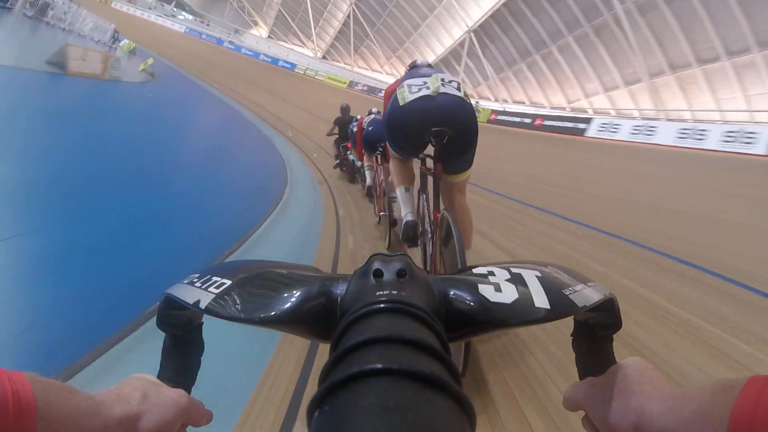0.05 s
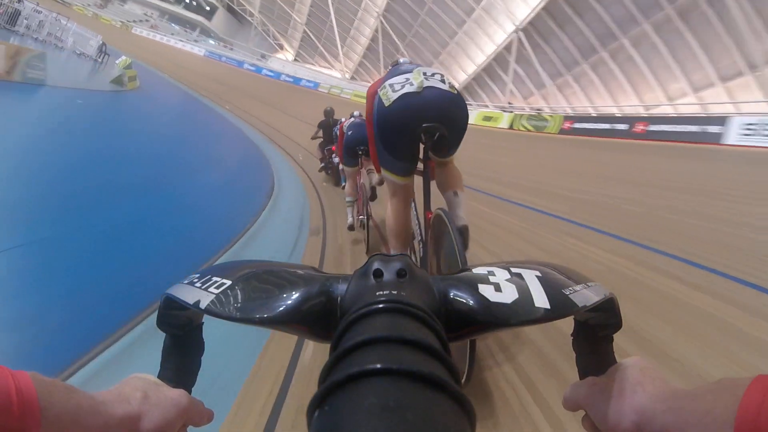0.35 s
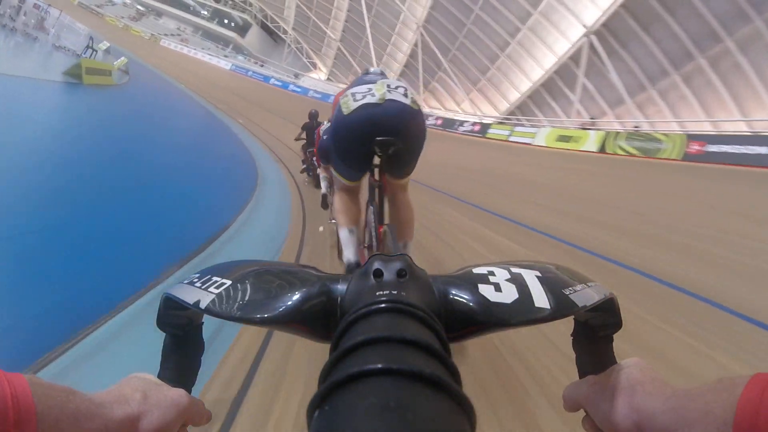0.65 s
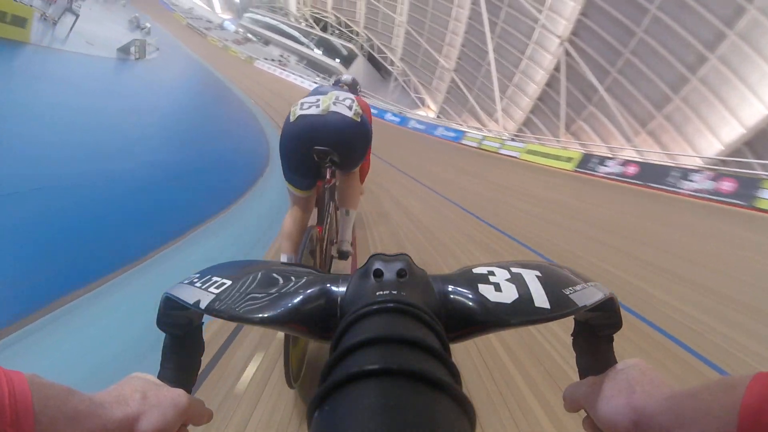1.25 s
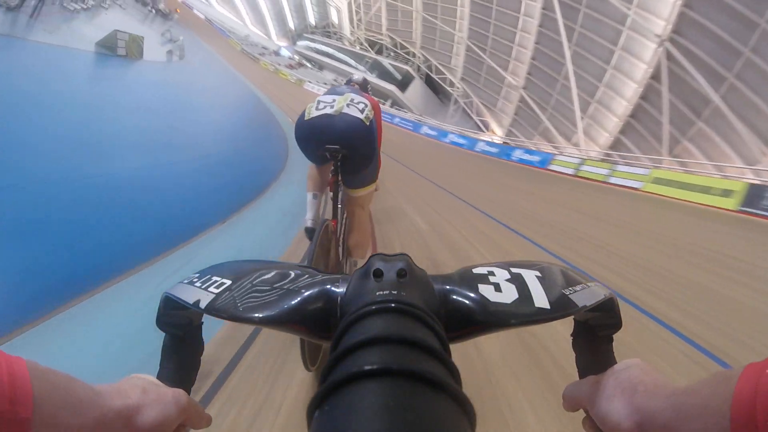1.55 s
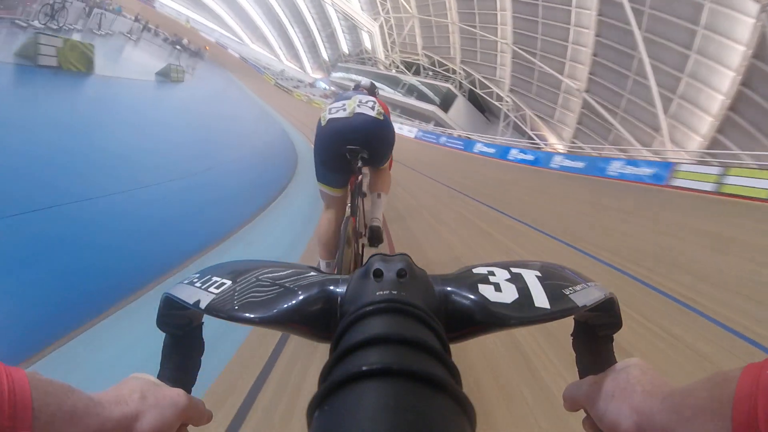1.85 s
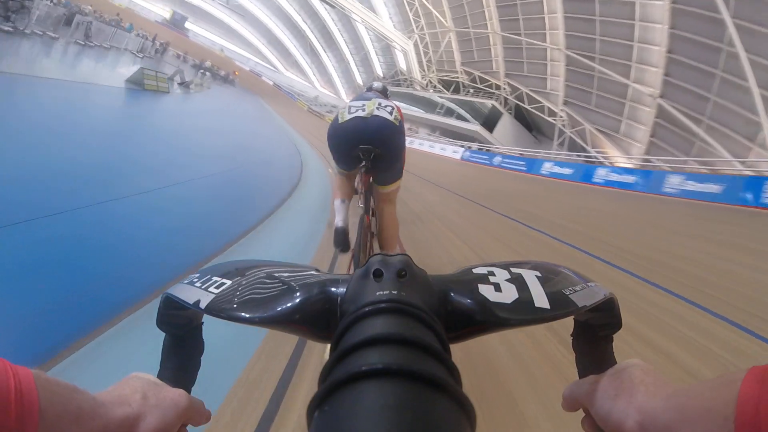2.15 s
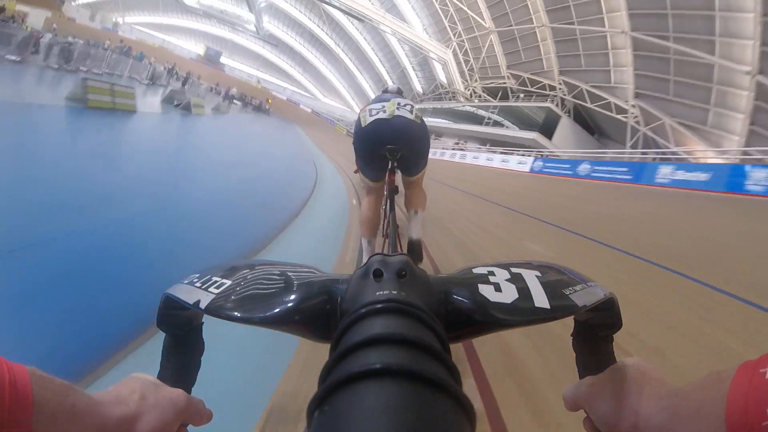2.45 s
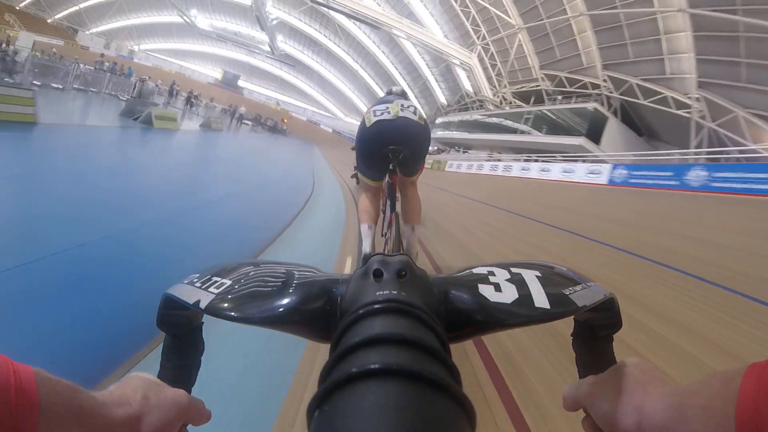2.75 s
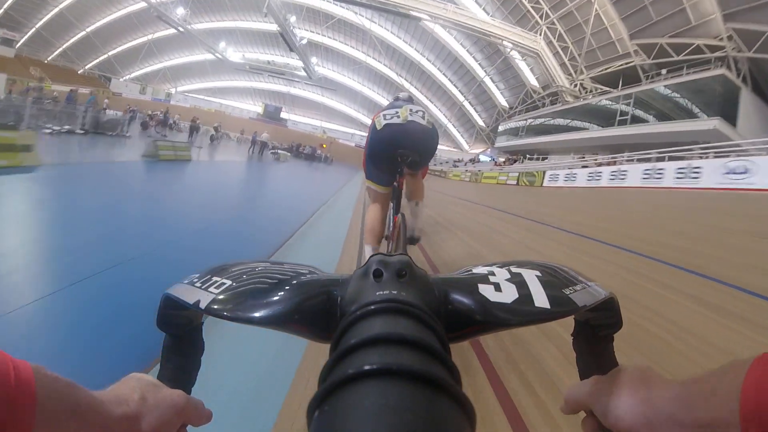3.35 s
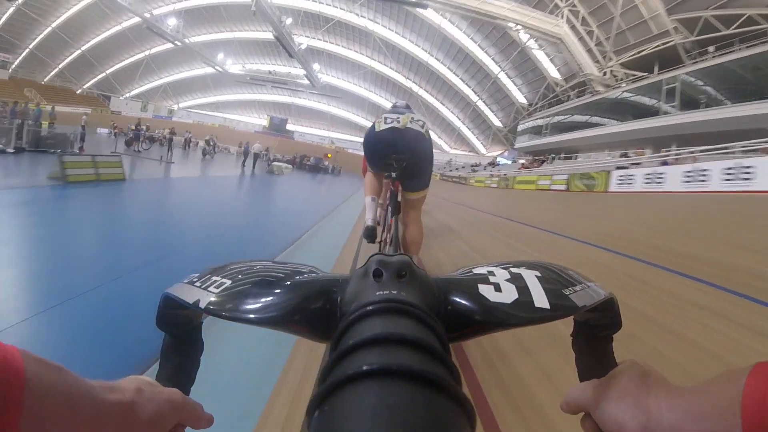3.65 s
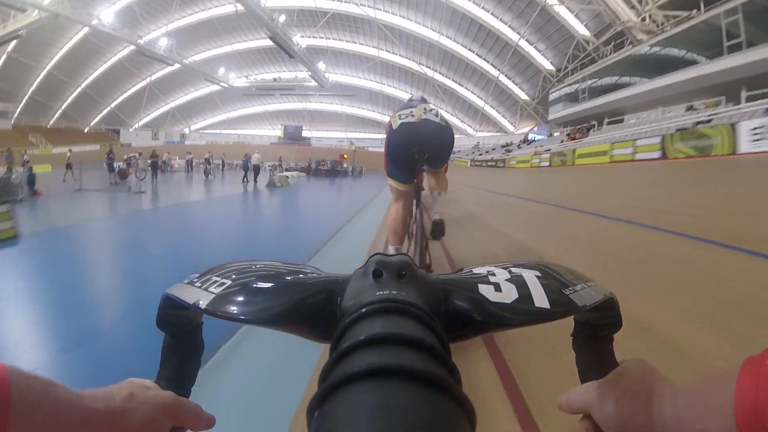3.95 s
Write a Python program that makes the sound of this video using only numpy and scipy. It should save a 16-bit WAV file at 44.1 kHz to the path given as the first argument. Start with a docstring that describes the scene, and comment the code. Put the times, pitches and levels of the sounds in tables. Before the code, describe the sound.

Wind buffets a microphone on a track bicycle for all four seconds, a deep fluttering rumble with short thumps and a light hiss. Underneath, tyres roar and hum on wooden boards, and the chain whirs faintly with the pedalling. Light handlebar clacks and dull knocks come in the first second and again between about 2 and 3.7 seconds. The wind dips briefly near 3.8 seconds, then returns.

```python
"""On an indoor wooden track, a camera on a track bicycle's stem hears it ride in a line of cyclists.
Wind buffets the microphone and hisses over the housing. The tyres roar on the boards and set the
wheels and frame ringing, while the chain whirrs tooth by tooth under the pedalling.
Now and then a jolt rings the handlebar, a bump knocks under a tyre or a small rattle ticks."""
import sys
import numpy as np
from scipy.fft import rfft, irfft, next_fast_len
from scipy.io import wavfile
from scipy.ndimage import uniform_filter1d, map_coordinates

SR = 44100
rng = np.random.default_rng(int(sys.argv[2]) if len(sys.argv) > 2 else 0)


def master_out(mix):
    """Clip the mix to full scale and print it as 16-bit PCM to the path in sys.argv[1]."""
    frames = np.transpose(np.atleast_2d(mix))
    ceiling = np.clip(frames, -1, 1)
    pcm = np.round(ceiling * 32767).astype(np.int16)
    wavfile.write(sys.argv[1], SR, pcm)


N = 176400  # 4 seconds
EDDY_RATE, FLUTTER_RATE, SWAY_RATE = 40, 190, 14  # random swings a second


def amp(db):
    """Turn decibels into a number to multiply by."""
    return 10 ** (np.asarray(db) / 20)


def unit(x):
    """Scale x so that its average strength (rms) is 1."""
    return x / np.sqrt(np.mean(x ** 2) + 1e-20)


def even(x, window_s):
    """Hold the strength of x near 1 from one short stretch to the next."""
    power = np.abs(uniform_filter1d(x ** 2, int(window_s * SR)))
    return x / np.sqrt(power + 1e-9)


def curve(rows):
    """Join (time [s], value) points with straight lines, one value per sample."""
    return np.interp(np.arange(N) / SR, *np.transpose(rows))


def wobble(rate):
    """A smooth curve through `rate` random points a second."""
    points = rng.standard_normal(N // 40)
    return map_coordinates(points, [np.arange(N) * rate / SR], mode="wrap")


def filtered(x, response):
    """Turn each frequency in x up or down by response(frequency)."""
    size = next_fast_len(N + SR // 2)
    hz = np.fft.rfftfreq(size, 1 / SR)
    return irfft(rfft(x, size) * response(hz), size)[:N]


def noise(tone, swing_db=0):
    """Noise of strength 1 that swells by swing_db, shaped by (frequency [Hz], level [dB]) points."""
    f, db = np.transpose(tone)
    raw = rng.standard_normal(N) * amp(swing_db)
    return unit(filtered(raw, lambda hz: amp(np.interp(np.log(hz + 1), np.log(f + 1), db))))


def strikes(rows, fade_s):
    """The loudness of (time [s], level [dB]) blows that each fall 60 dB in fade_s."""
    t = np.arange(N) / SR
    return sum((t >= s) * amp(db - 60 * np.abs(t - s) / fade_s) for s, db in rows)


# How hard the wind rumbles; here and below, gain_db shifts the whole table (time [s], level [dB])
BUFFET_LEVELS = [(0, -17.5), (.3, -17), (.5, -18.5), (.88, -15.5), (1.0, -17.5), (1.16, -18), (1.26, -19.5),
                 (1.62, -19.5), (1.88, -22.5), (2.05, -19), (2.6, -16.5), (2.8, -17.5), (3.1, -17),
                 (3.53, -16.5), (3.68, -20), (3.8, -26.5), (3.9, -15.5), (4, -15.5)]
# The rumble's deep tone (frequency [Hz], level [dB])
BUFFET_TONE = [(8, -33.5), (20, -2), (35, 0.5), (70, -3), (85, -6), (110, -9.5), (145, -12.5), (180, -14.5),
               (220, -15), (310, -25), (600, -34), (1500, -51.5), (4000, -83.5), (10000, -120)]

def buffet(eddies, gain_db=-1):
    """Eddies, small swirls of air, push on the microphone in a low, even flutter."""
    swing_db = 2 * eddies + 2 * wobble(FLUTTER_RATE)
    return amp(curve(BUFFET_LEVELS) + gain_db) * even(noise(BUFFET_TONE, swing_db), window_s=.11)


# Gusts of wind (time [s], level [dB])
GUST_LEVELS = [(0, -53.5), (.2, -41), (.36, -39), (.52, -42.5), (.62, -56), (.73, -40), (.81, -57.5),
               (2.3, -57), (2.6, -50), (3.1, -44), (3.45, -50), (3.7, -54), (4, -53)]
# Their mid-pitched tone (frequency [Hz], level [dB])
GUST_TONE = [(150, -21), (260, 10), (550, -9), (850, 1), (1000, -0.5), (1400, -0.5), (1750, -8.5),
             (2400, -25), (6000, -69)]

def gusts(eddies):
    """Gusts add a brighter rush above the wind's rumble."""
    return amp(curve(GUST_LEVELS)) * noise(GUST_TONE, swing_db=3 * eddies)


# Air passing over the housing (time [s], level [dB])
HISS_LEVELS = [(0, -55.5), (.3, -45.5), (.65, -51.5), (1.07, -48.5), (1.25, -53), (1.45, -54.5),
               (1.85, -51.5), (2.2, -52.5), (2.5, -50.5), (2.7, -51), (3, -51.5), (3.13, -48.5),
               (3.35, -53), (3.65, -56), (3.83, -49.5), (4, -56)]
# Its bright tone (frequency [Hz], level [dB])
HISS_TONE = [(500, -4.5), (1700, 5), (2800, -6), (3100, -5), (4250, -6), (4800, 2.5), (5800, -0.5),
             (6200, 1.5), (6430, 2.5), (6700, -2.5), (7000, -16), (7400, -12), (8600, -16), (10800, -25),
             (12200, -41)]

def air_hiss(eddies, gain_db=-1.5):
    """Air hisses over the housing, fluttering with the eddies."""
    swing_db = 0.46 * eddies + 2 * wobble(FLUTTER_RATE)
    return amp(curve(HISS_LEVELS) + gain_db) * noise(HISS_TONE, swing_db)


# The sharp tone of grit and churning air (frequency [Hz], level [dB])
SPATTER_TONE = [(900, -3), (2500, -3.5), (4500, 7.5), (7500, 4.5), (9500, -11), (11000, -20.5),
                (12400, -45.5)]

def spatter(eddies, gain_db=-11.5, grains_per_s=210, grain_s=.001):
    """Tiny sharp grains follow the level of the air's hiss and swell with the eddies."""
    starts = (rng.random(N) < grains_per_s / SR) * 1.0
    grains = np.abs(uniform_filter1d(starts, int(grain_s * SR)))
    swing_db = 20 * np.log10(grains + 1e-9) + 5.5 * eddies
    return amp(curve(HISS_LEVELS) + gain_db) * noise(SPATTER_TONE, swing_db)


# Tyres rolling on the boards (time [s], level [dB])
ROAR_LEVELS = [(0, -28.5), (.18, -32), (.33, -27.5), (.55, -28.5), (.73, -27.5), (.85, -34.5), (.96, -27),
               (1.17, -33.5), (1.42, -27.5), (1.53, -33.5), (1.65, -29.5), (1.87, -28.5), (2.06, -27),
               (2.2, -28.5), (2.33, -30), (2.46, -25.5), (2.62, -29.5), (3.45, -29.5), (3.73, -32.5),
               (3.95, -27)]
# The tone of their roar (frequency [Hz], level [dB])
ROAR_TONE = [(60, 3), (220, -5), (420, -1), (720, -3), (880, -12.5), (1100, -13), (1200, -18.5),
             (1700, -23.5), (2100, -27.5), (3100, -29.5), (7000, -53), (12000, -100)]
# Notes at which the wheels and frame ring (frequency [Hz], width [Hz], level [dB])
FRAME_NOTES = [(231.2, 28, 9.5), (365.7, 22, 9.5), (469, 13.2, 8.5), (504, 27, 2), (658, 100, -8),
               (999, 43, 0), (1160, 21, -12), (1328, 41, -5.5), (1453, 33, -15.5)]

def tyres(eddies, sway, roar_db=-4, ring_db=-8, dull_above_hz=2500):
    """The grain of the boards roars under the tyres and rings the wheels and frame."""
    def frame(f):
        response = 0
        for k, (hz, width, db) in enumerate(FRAME_NOTES):
            note = 1j * f * width / (hz * hz - f * f + 1j * f * width)  # strongest where f is hz
            response += (-1) ** k * amp(db) * note
        return response / (1 + (f / dull_above_hz) ** 6)

    swing_db = 0.96 * eddies - sway + 2 * wobble(FLUTTER_RATE)
    shaking = rng.standard_normal(N) * amp(swing_db)
    ring = amp(ring_db) * unit(filtered(shaking, frame))
    roar = amp(roar_db) * noise(ROAR_TONE, swing_db)
    return amp(curve(ROAR_LEVELS)) * (roar + ring)


# The wheels' hum coming and going (time [s], level [dB])
HUM_LEVELS = [(0, -39.5), (.45, -48), (.58, -35.5), (.87, -36.5), (.97, -49), (1.28, -46), (1.39, -35),
              (1.54, -51), (1.59, -29), (1.66, -45.5), (1.94, -41), (2.04, -33), (2.15, -38), (2.31, -48.5),
              (2.48, -45.5), (3.1, -42), (3.75, -46), (4, -45)]

def wheel_hum(pitch_hz=570, drift_hz=13, waver_db=3, wobbles_per_s=50):
    """The wheels' strongest note sings on the boards in rough, wavering pulses."""
    hz = pitch_hz + drift_hz * wobble(wobbles_per_s)
    note = amp(waver_db * wobble(wobbles_per_s)) * np.sin(2 * np.pi * np.cumsum(hz) / SR)
    return amp(curve(HUM_LEVELS)) * even(note, window_s=.12)


# Swells of tyre hiss (time [s], level [dB], middle frequency [Hz])
SWISH_SWELLS = [(0, -53, 5500), (.3, -63, 5200), (.45, -63, 5900), (.53, -51, 6050), (.72, -56, 5950),
                (.85, -55.5, 5950), (1.08, -57, 6060), (1.22, -62, 6100), (1.42, -68, 6150),
                (1.661, -53.5, 6390), (1.761, -67.5, 6150), (2.22, -62, 5757), (2.35, -56, 5850),
                (2.56, -59, 5750), (2.68, -71, 5780), (3, -63, 5724), (3.12, -55, 5900), (3.35, -55, 5600),
                (3.45, -64, 5700), (3.719, -66, 5540), (3.82, -55.5, 5550), (4, -62, 5620)]

def tyre_swish(gain_db=-1.5, width_hz=1120):
    """A narrow band of tyre hiss swells and drifts in pitch."""
    times, db, hz = np.transpose(SWISH_SWELLS)
    band = lambda f: 1 / (1 + (2 * f / width_hz) ** 4)
    low_a, low_b = (filtered(rng.standard_normal(N), band) for _ in range(2))
    phase = 2 * np.pi * np.cumsum(curve(np.c_[times, hz])) / SR
    hiss = unit(low_a * np.cos(phase) + low_b * np.sin(phase))  # lifts the low noise up to hz
    return amp(curve(np.c_[times, db]) + gain_db) * hiss


# The chain's whirr, rising with each push on the pedals (time [s], level [dB])
CHAIN_LEVELS = [(0, -48), (.25, -48.5), (.55, -53.5), (.85, -49.5), (1.05, -56.5), (1.4, -53), (1.56, -56),
                (1.82, -53), (2.1, -50.5), (2.27, -56.5), (2.45, -52), (2.73, -49), (2.95, -55.5),
                (3.25, -47), (3.5, -57), (3.73, -56.5), (3.88, -56.5), (4, -43)]
# How fast links meet the teeth (time [s], rate [links/s])
LINK_RATES = [(.25, 77.5), (.7, 76.5), (1.3, 75.8), (2.1, 77), (2.6, 78), (3.1, 77.5), (3.9, 78)]
# The tone of the clicks (frequency [Hz], level [dB])
CHAIN_TONE = [(900, -5), (1500, 0), (2000, -1.5), (2190, 2), (2450, -0.5), (2850, 2), (3120, -8.5),
              (3330, 4), (3480, 1.5), (3750, -4), (4250, -7.5), (5200, -9), (6400, -11), (7100, -9),
              (9000, -27), (12000, -47)]

def chain(gain_db=-1, scatter_db=2.34, rise_s=0.002, fade_s=0.028):
    """Each link settles on a tooth with a soft click that fades before the next."""
    rate = curve(LINK_RATES)
    links = np.cumsum(rate) / SR
    age = links % 1 / rate  # seconds since the latest link landed
    size_db = scatter_db * rng.standard_normal(int(links[-1]) + 1)[links.astype(int)]
    click_db = 20 * np.log10(1.001 - np.exp(-age / rise_s)) - 60 * age / fade_s
    return amp(curve(CHAIN_LEVELS) + gain_db) * noise(CHAIN_TONE, size_db + click_db)


# Hard jolts through the handlebar (time [s], level [dB])
JOLTS = [(0.062, -24.5), (0.115, -31), (0.178, -30), (0.529, -27.5), (2.299, -28.5), (2.9655, -26),
         (3.088, -30), (3.2108, -31), (3.662, -31)]
# The handlebar's notes (frequency [Hz], level [dB], time to fall 60 dB [s])
HANDLEBAR_NOTES = [(644, 2, 0.017), (1026, 1.5, 0.019), (1424, -6, 0.016), (1840, -8.5, 0.016),
                   (2590, -17, 0.013)]

def handlebar_clacks(gain_db=-1.5, pitch_scatter=0.07):
    """Each jolt rings the handlebar for a moment, at slightly different pitches."""
    t, out = np.arange(N) / SR, np.zeros(N)
    for start, jolt_db in JOLTS:
        age = np.maximum(t - start, 0)
        for hz, note_db, fade_s in HANDLEBAR_NOTES:
            chance = rng.standard_normal()
            ring = np.sign(chance) * np.sin(2 * np.pi * hz * np.exp(pitch_scatter * chance) * age)
            fade_db = -60 * np.minimum(age / fade_s, 10)
            out += amp(jolt_db + note_db + fade_db) * ring
    return amp(gain_db) * out


# The hardest single eddies (time [s], level [dB])
HARD_EDDIES = [(0.115, -9), (0.3, -13), (0.348, -7), (0.429, -13), (0.593, -8.5), (0.696, -7),
               (0.913, -16.5), (1.373, -11.5), (2.163, -15), (2.302, -8.5), (2.579, -6), (2.647, -9),
               (3.311, -21), (3.412, -9.5), (3.46, -14.5), (3.514, -21), (3.914, -24)]

def wind_slaps(gain_db=-1.5, pitch_hz=117, pitch_scatter=0.29, half_length_s=0.0046):
    """A hard eddy slaps the microphone with one short push and its rebound."""
    t, out = np.arange(N) / SR, np.zeros(N)
    for middle, db in HARD_EDDIES:
        hz = pitch_hz * np.exp(pitch_scatter * rng.standard_normal())
        swell = np.exp(-((t - middle) / half_length_s) ** 2)
        out += amp(db + gain_db) * swell * np.cos(2 * np.pi * hz * (t - middle))
    return out


# Bumps in the boards (time [s], level [dB])
BUMPS = [(0.293, -23), (0.329, -28), (0.715, -24), (0.95, -21.5), (1.217, -29), (2.13, -30), (2.669, -23.5)]
# Their dull tone (frequency [Hz], level [dB])
BUMP_TONE = [(100, -9.5), (400, 13.5), (900, -1), (1500, -13.5), (2700, -25), (5000, -23.5), (12000, -100)]

def board_knocks(rise_s=0.0013, fade_s=0.068):
    """A tyre crosses uneven boards with dull, soft-edged knocks."""
    loudness = uniform_filter1d(strikes(BUMPS, fade_s), int(rise_s * SR))
    return loudness * noise(BUMP_TONE)


# Rougher stretches of board (time [s], half length [s], level [dB])
ROUGH_PATCHES = [(0.299, 0.013, -26.5), (0.352, 0.018, -30.5), (0.417, 0.012, -36.5), (0.754, 0.031, -38),
                 (1.09, 0.021, -29.5), (2.128, 0.024, -26.5), (2.493, 0.025, -28.5), (3.456, 0.011, -29)]
# The tone of the wheels' growl (frequency [Hz], level [dB])
GROWL_TONE = [(200, -10.5), (310, -1.5), (370, 9.5), (420, -7.5), (470, 10.5), (530, -10), (580, 2),
              (700, -19.5), (1000, -11), (1400, -25), (2200, -33), (9000, -97)]

def wheel_growls(gain_db=2):
    """The wheels growl briefly as the tyres cross rougher boards."""
    t = np.arange(N) / SR
    swells = sum(amp(db) * np.exp(-((t - middle) / half) ** 2) for middle, half, db in ROUGH_PATCHES)
    return amp(gain_db) * swells * even(noise(GROWL_TONE), window_s=0.023)


# Small rattles of the bicycle (time [s], level [dB])
RATTLES = [(0.969, -48.5), (1.081, -42.5), (1.351, -47), (2.681, -47), (2.936, -46), (3.512, -39.5)]
# Their bright tone (frequency [Hz], level [dB])
RATTLE_TONE = [(800, -10), (3400, 6), (6300, 2.5), (7500, 0.5), (9500, -8), (11500, -17), (12500, -35.5)]

def rattle_ticks(gain_db=2, fade_s=.007):
    """The bicycle rattles in short, bright ticks."""
    return amp(gain_db) * strikes(RATTLES, fade_s) * noise(RATTLE_TONE)


def scene():
    """Add up wind, track and bicycle; wind and tyres share the unsteadiness of the ride."""
    eddies, sway = wobble(EDDY_RATE), wobble(SWAY_RATE)
    wind = buffet(eddies) + wind_slaps() + gusts(eddies) + air_hiss(eddies) + spatter(eddies)
    track = tyres(eddies, sway) + wheel_hum() + tyre_swish() + wheel_growls() + board_knocks()
    bicycle = chain() + handlebar_clacks() + rattle_ticks()
    return (wind + track + bicycle)[None]


def record(dry):
    """The camera keeps nothing above its highest frequency."""
    top_hz = 12600
    return filtered(dry[0], lambda hz: hz < top_hz)[None]


dry = scene()
out = record(dry)
master_out(out)
```